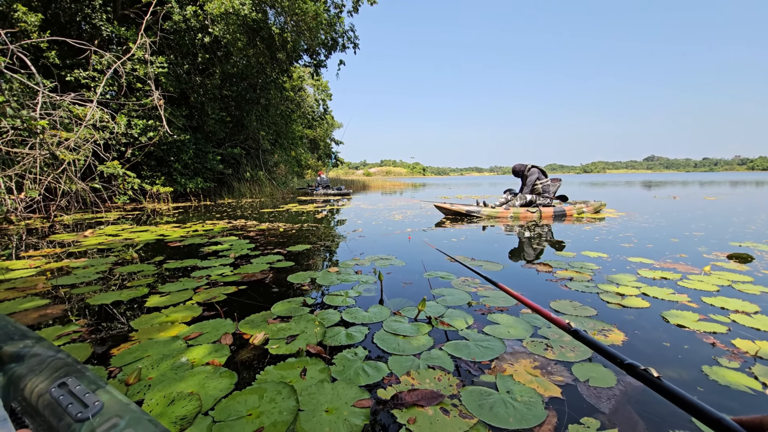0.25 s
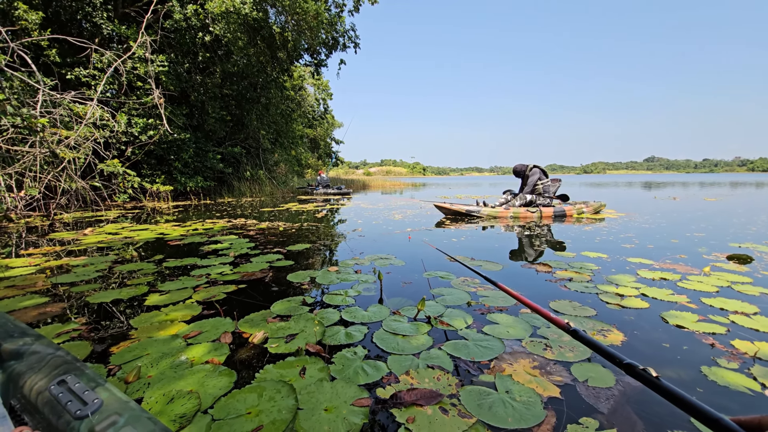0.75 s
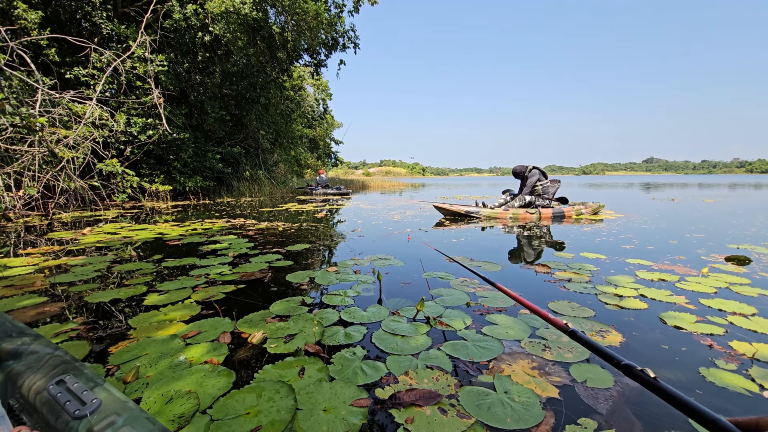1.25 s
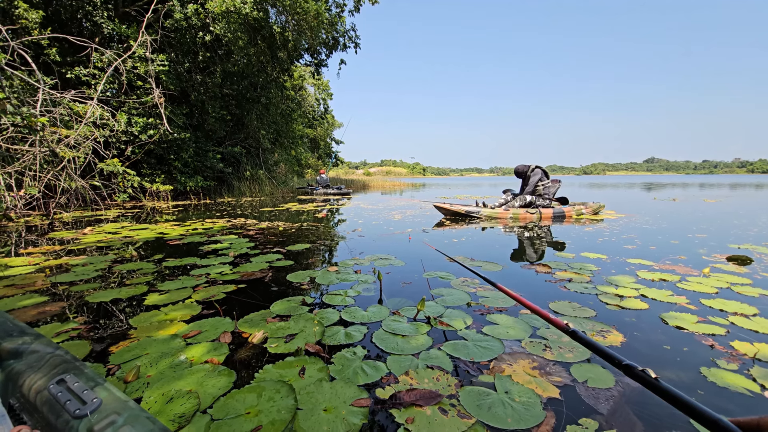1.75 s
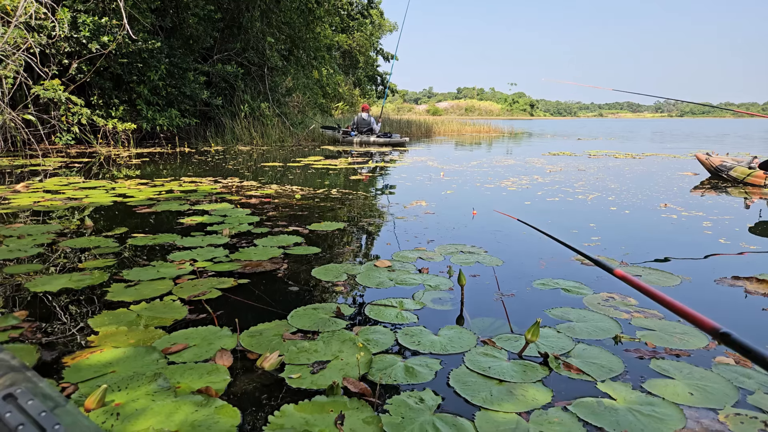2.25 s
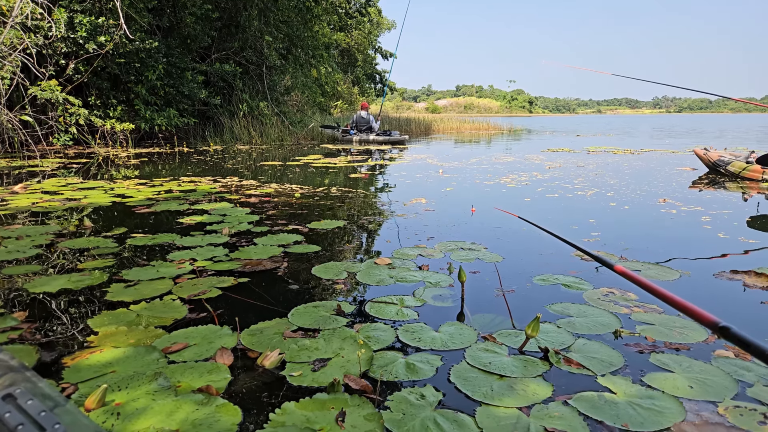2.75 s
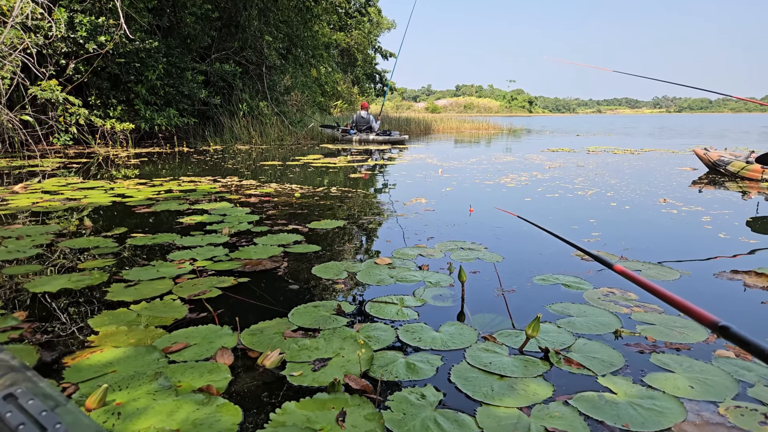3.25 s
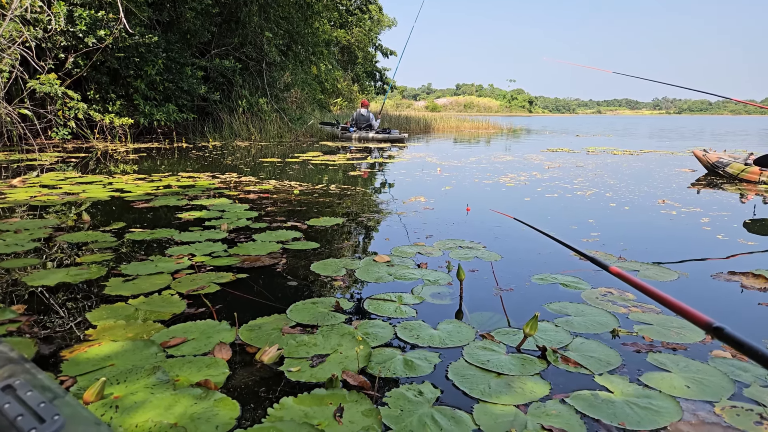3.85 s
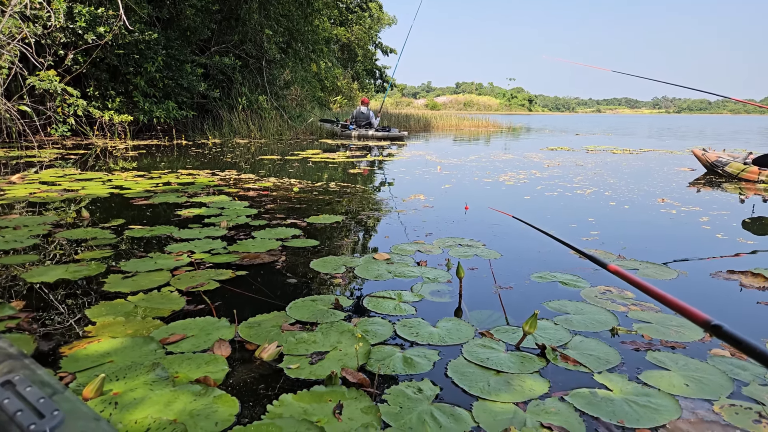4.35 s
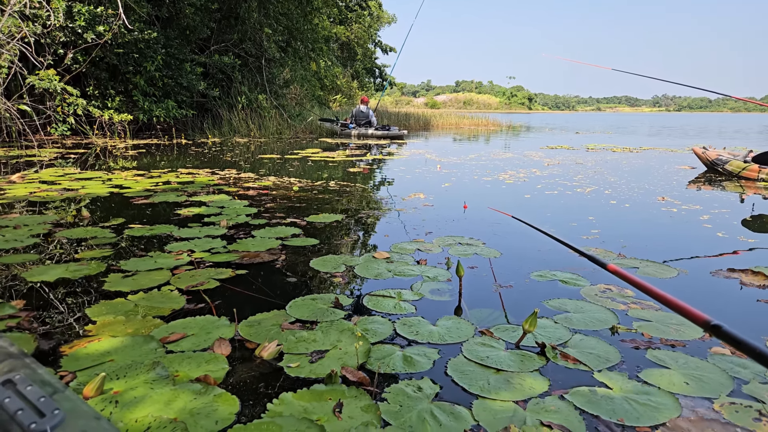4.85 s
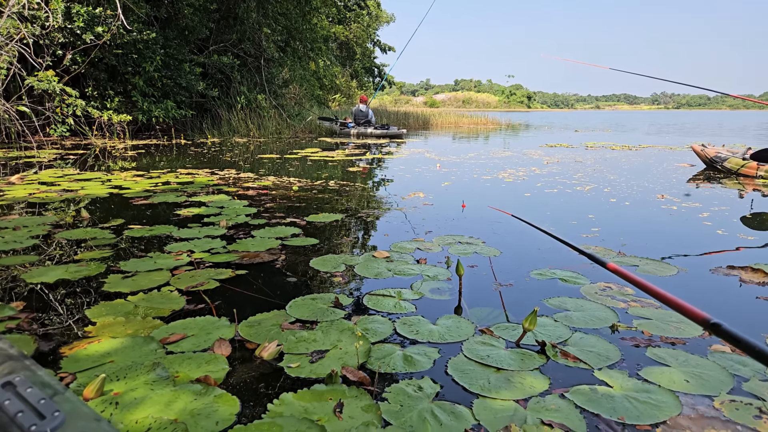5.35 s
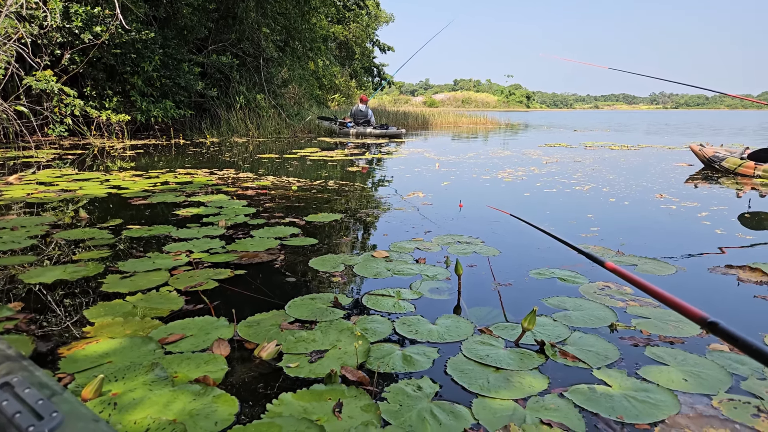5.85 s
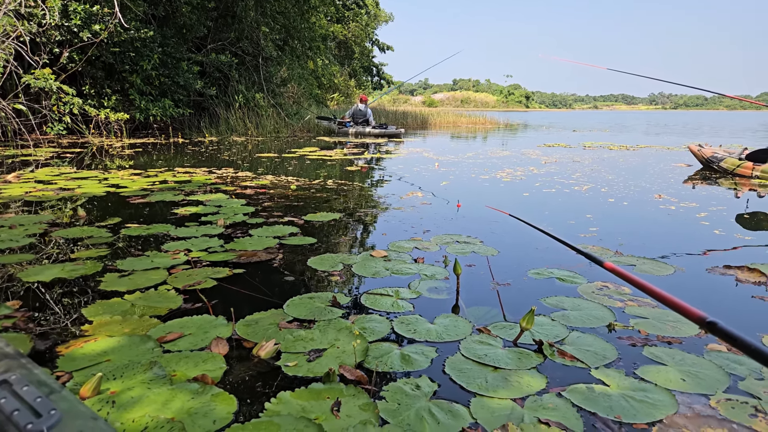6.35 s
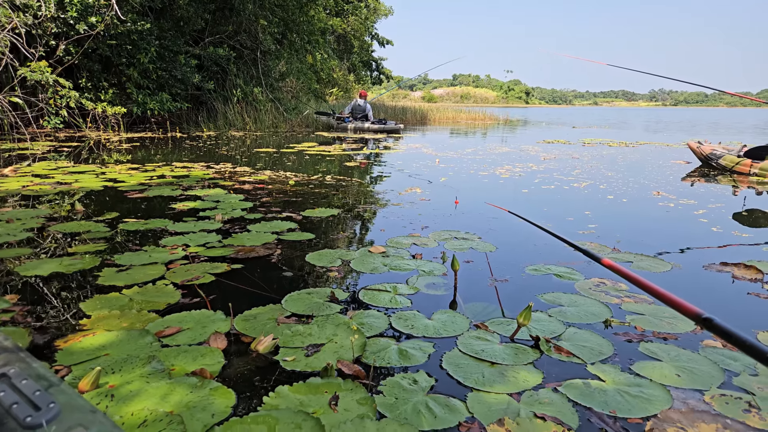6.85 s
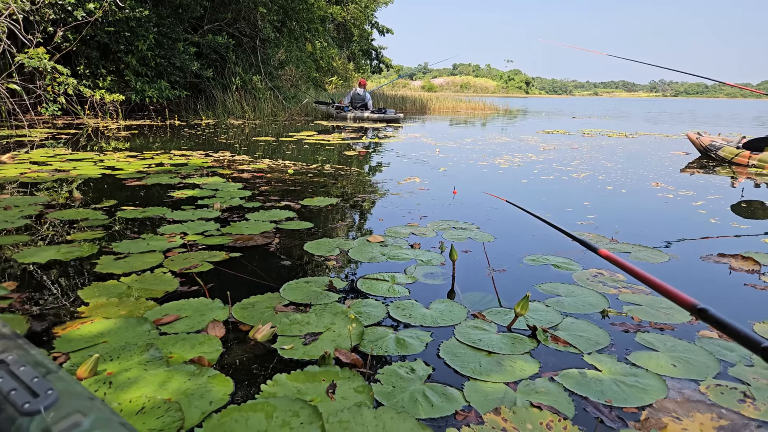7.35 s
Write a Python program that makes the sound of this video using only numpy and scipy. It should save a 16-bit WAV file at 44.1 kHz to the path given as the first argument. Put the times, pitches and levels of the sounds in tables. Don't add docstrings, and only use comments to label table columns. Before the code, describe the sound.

Outdoors on a still lake, very close to the microphone, a fishing rod butt knocks and bounces on a hollow plastic kayak, with boomy thuds, sharp cracks and loose gear rattling. After about two seconds it cuts to silence for an instant, then much quieter open air follows: thin insect hiss, faint bird peeps and whistles, small boat ticks, and two flies droning past, the second closer. Another tiny silent gap comes near the end.

```python
import sys
import numpy as np
from scipy import signal
from scipy.fft import rfft, irfft, next_fast_len
from scipy.io import wavfile
from scipy.ndimage import uniform_filter1d

SR = 44100
rng = np.random.default_rng(int(sys.argv[2]) if len(sys.argv) > 2 else 0)


def store_wav(level_fs):
    pcm = np.round(np.clip(np.atleast_2d(level_fs), -1, 1) * 32767)
    wavfile.write(sys.argv[1], SR, pcm.T.astype(np.int16))


def volts_from_decibels(level):
    exponent = np.asarray(level, float) / 20
    return 10 ** exponent


N = 335248


def evened(x):
    return x / np.sqrt(np.mean(x ** 2) + 1e-20)


def read(points, hz):
    f, value = np.transpose(points)
    return np.interp(np.log(hz + 1), np.log(f + 1), value)


def add(mix, s, sound):
    part = mix[:, round(s * SR):][:, :sound.shape[1]]
    part += sound[:, :part.shape[1]]


def placed(x, pan_db):
    return x * volts_from_decibels(np.array([pan_db / 2, -pan_db / 2]).reshape(2, -1))


def band_noise(noise, band_hz, order):
    return signal.sosfilt(signal.butter(order, band_hz, "band", fs=SR, output="sos"), noise)


def high_passed(x, hz):
    return signal.sosfilt(signal.butter(3, hz, "high", fs=SR, output="sos"), x)


# f/Hz, level/dB, t60/s, first swing (1 out, -1 in)
BELLY = [(99.2, -15.8, 0.197, 1), (109.9, -4.4, 0.084, -1), (124.4, -24.0, 0.589, 1),
         (133.6, -6.0, 0.225, -1), (147.9, -22.4, 0.607, -1), (162.5, -4.7, 0.171, -1),
         (166.3, 5.2, 0.053, 1), (186.1, -26.9, 0.597, 1), (193.5, -7.5, 0.103, -1),
         (195.5, -14.6, 0.217, 1), (215.4, -26.5, 0.6, 1), (232.7, -19.1, 0.188, 1),
         (244.6, -32.6, 0.481, -1), (268.3, -33.2, 0.385, -1)]
DECK = [(280.8, -25.1, 0.202, 1.0), (309.6, -18.3, 0.175, -1.0), (338.4, -4.8, 0.063, -1.0),
        (373.5, -5.6, 0.103, 1.0), (414.2, -10.2, 0.143, -1.0), (472.5, -11.5, 0.074, 1.0),
        (527.8, -24.1, 0.125, -1.0), (662.3, -27.1, 0.131, -1.0), (741.0, -14.1, 0.068, -1.0),
        (782.2, -8.8, 0.018, 1.0), (920.8, -20.6, 0.057, -1.0), (992.1, -26.7, 0.05, -1.0),
        (1267.3, -29.1, 0.061, 1.0), (1427.1, -29.8, 0.06, -1.0)]
# t/s, belly level/dB, deck level/dB, sign (1 rod lands, -1 springs off)
RINGS = [(0.7928, -33.3, -60.0, 1), (0.9253, -15.1, -60.0, 1), (0.9332, -60.0, -24.8, 1),
         (0.9456, -26.9, -29.0, 1), (0.962, -12.6, -19.4, 1), (0.9675, -18.7, -25.2, -1),
         (0.9864, -30.1, -32.0, 1), (1.0481, -34.4, -58.7, 1), (1.2507, -7.5, -11.4, 1),
         (1.2563, -50.1, -22.6, -1), (1.264, -20.3, -55.6, -1), (1.2747, -26.1, -57.1, 1),
         (1.2878, -23.0, -60.0, 1), (1.2952, -12.9, -34.0, 1), (1.3195, -16.4, -21.4, 1),
         (1.3449, -30.2, -36.6, 1), (1.3882, -33.3, -60.0, 1), (1.525, 0.0, 0.1, 1),
         (1.5698, -29.3, -27.1, 1), (1.6351, -19.6, -58.6, 1), (1.6499, -11.5, -44.4, 1),
         (1.661, -23.8, -60.0, 1), (1.689, -27.3, -60.0, 1), (1.7443, -31.7, -51.6, 1),
         (1.7586, -23.8, -60.0, 1), (1.803, -1.1, -0.1, 1), (1.8152, -18.1, -30.6, 1),
         (1.8465, -25.4, -60.0, 1), (1.8714, -30.4, -30.5, 1), (1.913, -27.8, -60.0, 1),
         (1.9228, -28.9, -44.6, -1), (1.9324, -30.5, -60.0, 1), (1.94, -24.8, -50.3, 1),
         (1.9667, -31.5, -42.7, 1), (1.9816, -30.1, -60.0, 1), (2.0125, -24.8, -29.6, 1),
         (2.0185, -19.4, -53.5, -1), (2.0248, -26.9, -35.8, 1), (2.0328, -34.3, -36.4, 1),
         (2.042, -60.0, -36.1, 1)]


def hull_ring():
    swell_s = 0.0014
    t = np.arange(SR // 2) / SR
    out = np.zeros((1, N))

    def body(modes):
        return sum(sign * volts_from_decibels(db - 60 * t / t60) * np.sin(2 * np.pi * hz * t) for hz, db, t60, sign in modes)

    belly = body(BELLY)
    deck = body(DECK) * (1 - np.exp(-(t / swell_s) ** 4))
    for s, belly_db, deck_db, sign in RINGS:
        add(out, s, sign * (volts_from_decibels(belly_db) * belly + volts_from_decibels(deck_db) * deck)[None])
    return out


def ring(modes, t, spot):
    hz, db, t60 = np.transpose(modes)[:, :, None]
    weight_db, detune = spot[:, :len(modes), None]
    sign = -(-1.) ** np.arange(len(modes))[:, None]
    db = db + 2.2 * weight_db
    hz = hz * (1 + 0.02 * detune)
    return (sign * volts_from_decibels(db - 60 * t / t60) * np.sin(2 * np.pi * hz * t)).sum(0)


# f/Hz, level/dB, t60/s
SLAP_LOW = [(165, 14, 0.039)]
SLAP_HIGH = [(346, 5.5, 0.03), (494, -3, .04), (734, -12.5, 0.056), (1080, -16, 0.033), (1424, -17.5, 0.1)]
RUMBLE_HZ = [94.1, 300.7]
THUD_HZ = [282.7, 1501]


def thump(t, deck_db, slap_db, edge, near, far):
    rumble_db, rumble_t60_s = -13, 0.12
    thud_db, thud_t60_s = -9.5, 0.09
    grip_s = 0.115
    swell = 1 - np.exp(-t / 0.0021)
    rumble = 4 * band_noise(near[::-1], RUMBLE_HZ, 2)
    belly = 0.14 * volts_from_decibels(slap_db) * ring(SLAP_LOW, t, 0.08 * edge)
    belly = belly + volts_from_decibels(rumble_db - 60 * t / rumble_t60_s) * swell * rumble
    slap = ring(SLAP_HIGH, t, 0.6 * edge[::-1])
    thud = 4 * band_noise(near + 0.35 * far, THUD_HZ, 1)
    deck = volts_from_decibels(slap_db) * (1 - 0.5 * np.exp(-t / 0.0017)) * slap
    deck = deck + volts_from_decibels(thud_db - 60 * t / thud_t60_s) * swell * thud
    return np.exp(-(t / grip_s) ** 2) * (belly + 0.5 * volts_from_decibels(deck_db) * deck)


def crack_and_fizz(t, near, far):
    crack_t60_s, fizz_t60_s = 0.032, 0.019
    rattle_db, rattle_t60_s = -18, 0.18
    rise = 1 - np.exp(-t / 0.00067)
    grit = near + 0.5 * far
    rattle = volts_from_decibels(rattle_db - 60 * t / rattle_t60_s) * far[::-1]
    crack = 0.7 * rise * (grit * volts_from_decibels(-60 * t / crack_t60_s) + rattle)
    fizz = 0.74 * rise * (grit * volts_from_decibels(-60 * t / fizz_t60_s) + 0.2 * rattle)
    return crack, fizz


# t/s, level/dB, upper modes/dB, crack/dB, fizz/dB
BLOWS = [(0.787, -28.5, -14, -9.5, -28), (0.927, -12, -4, -20.5, -55), (0.963, -9.5, -5, -11, -17.5),
         (1.252, -16.5, -1.5, 2, -3), (1.321, -10.5, 1, -23, -23), (1.527, -14, 1.5, -0.5, -7.5),
         (1.65, -18, -7.5, -39.5, -46), (1.805, -14.5, -1.5, -5.5, -8.5), (1.874, -14, -7, -24.5, -53.5),
         (1.905, -24.5, -7, -31, -48), (2.015, -16, 5.5, -23.5, -39)]
# t/s, level/dB, upper modes/dB, crack/dB
BOUNCES = [(0.775, -35, -7, -14), (0.799, -25.5, -14, -15), (0.821, -43, -5, -27), (0.946, -13, -28, -31.5),
           (0.98, -32, -8, -4.5), (0.994, -17, -9, -32), (1.019, -20, -21, -29), (1.276, -13.5, -24, -29.5),
           (1.293, -16.5, -2, -20), (1.345, -15, -7.5, -32), (1.422, -28.5, -13.5, -30),
           (1.46, -54, 0, -23), (1.506, -25.5, -21.5, -21), (1.561, -30.5, -10.5, -26),
           (1.597, -35.5, -7.5, -37), (1.683, -13.5, -28, -38.5), (1.759, -20, -24.5, -31),
           (1.784, -20.5, -5.5, -29), (1.84, -32, -7.5, -23), (1.971, -26.5, -7, -23),
           (2.036, -49, 19, -17)]
# f/Hz, level/dB per Hz
CRACK = [(590, -33.5), (1000, -6), (2100, -12.5), (2750, -9.5), (3800, -17.5), (4960, -14), (6860, -27),
         (8960, -28), (10100, -39.5), (11200, -38), (12300, -35.5), (14900, -45.5), (16000, -46.5)]
# f/Hz, level/dB
LEFT = [(60, -0.5), (110, -1), (200, -1), (380, -3.0), (700, 1), (1290, -6), (2380, 0), (4400, 1),
        (8120, -4.5), (15000, 1)]


def knocks():
    blow_slap_db, bounce_slap_db, bounce_fizz_db = -1.5, -3.5, -4
    delay_s, left_lag_s, contact_s, hull_cut_hz = 0.0013, 0.25e-3, 0.00061, 100
    size = next_fast_len(N)
    t = np.arange(SR // 5) / SR
    hull, low, high = np.zeros((3, 2, size))

    hits = [(*row, blow_slap_db) for row in BLOWS]
    hits += [(*row, row[-1] + bounce_fizz_db, bounce_slap_db) for row in BOUNCES]
    for s, db, deck_db, crack_db, fizz_db, slap_db in sorted(hits):
        edge = rng.standard_normal((2, len(SLAP_HIGH)))
        noise = rng.standard_normal((3, len(t)))
        near, far = noise[0], noise[1:]
        crack, fizz = crack_and_fizz(t, near, far)
        s += delay_s
        add(hull, s, volts_from_decibels(db) * thump(t, deck_db, slap_db, edge, near, far))
        add(low, s, volts_from_decibels(db + crack_db) * crack)
        add(high, s, volts_from_decibels(db + fizz_db) * fizz)
    add(hull, 0, hull_ring())

    push = np.sin(np.pi * np.minimum(t[:200] / contact_s, 1)) ** 2
    hull = signal.lfilter(push / push.sum(), 1, hull[:, :3 * SR])
    hz = np.fft.rfftfreq(size, 1 / SR)
    colour = volts_from_decibels(read(CRACK, hz))
    upper = 1 / (1 + (4000 / (hz + 1)) ** 6)
    both = rfft(high_passed(hull, hull_cut_hz), size)
    both += rfft(low) * evened(colour * (1 - upper))
    both += rfft(high) * evened(colour * upper)
    both[0] *= volts_from_decibels(read(LEFT, hz)) * np.exp(-2j * np.pi * hz * left_lag_s)
    return irfft(both, size)[:, :N] * (np.arange(N) < np.mean(CUTS[0]) * SR)


# t/s, length/s, centre
# f/Hz, width/Hz, level/dB
RUSTLES = [(2.013, 0.016, 1250, 800, -37), (0.963, 0.02, 1250, 700, -35), (1.32, 0.018, 700, 350, -31),
           (1.651, 0.026, 1180, 1000, -55), (1.251, .016, 780, 300, -32), (1.526, .014, 1200, 600, -31),
           (1.804, .016, 1300, 600, -35), (.785, .03, 1200, 700, -55), (1.765, .055, 2000, 3000, -53),
           (1.238, .025, 3000, 4500, -55), (1.545, .04, 3500, 4000, -56), (1.285, .02, 6000, 10000, -52),
           (.97, .05, 3500, 3000, -50), (1.66, .016, 6000, 8000, -62), (.963, .01, 12500, 4000, -46),
           (.97, .04, 12500, 4000, -58), (1.25, .01, 12500, 3500, -44), (1.26, .06, 12500, 3500, -58),
           (1.792, .014, 5000, 6000, -54), (4.385, 0.044, 8600, 900, -69), (4.41, 0.041, 6600, 1800, -60),
           (4.43, 0.047, 4600, 900, -67), (5.51, 0.027, 4630, 1200, -64), (7.405, 0.012, 2500, 2500, -65),
           (.925, .04, 260, 90, -27), (.795, .06, 240, 120, -45), (1.968, .014, 5200, 1500, -59),
           (1.265, .07, 3500, 4500, -53), (1.32, .04, 3000, 4000, -53)]


def rustles():
    out = np.zeros((2, N))
    for s, length, hz, width, db in RUSTLES:
        grit = rng.standard_normal((2, int(length * SR)))
        puff = evened(band_noise(grit, [hz - width / 2, hz + width / 2], 2))
        add(out, s, volts_from_decibels(db) * puff * np.hanning(grit.shape[1]))
    return out


# t/s, peak level/dB, centre f/Hz, width/Hz, left-right/dB
TICKS = [
    (2.944, -42, 119, 80, 18.5),
    (4.095, -45.5, 893, 401, 15.5),
    (4.695, -33, 290, 510, 23),
    (4.695, -42.5, 1200, 500, 9),
    (4.697, -44.5, 5000, 6000, 27),
    (4.698, -40.5, 64, 35, 12),
    (5.837, -37.5, 7900, 5000, 11),
    (7.3463, -31, 3480, 3960, 16),
    (7.3497, -33, 3400, 3950, 26.5),
]


def ticks():
    out = np.zeros((2, N))
    t = np.arange(6000) / SR
    for s, db, hz, width, pan_db in TICKS:
        swing = volts_from_decibels(db) * np.exp(-np.pi * width * t) * np.sin(2 * np.pi * hz * t)
        add(out, s, placed(high_passed(swing, 0.47 * hz), pan_db))
    return out


def unrolled(rows):
    s, *columns = np.transpose(rows)
    t = np.arange(s[0], s[-1], 1 / SR)
    return s[0], [np.interp(t, s, c) for c in columns], signal.windows.tukey(len(t), 0.2)


def waver(count, seconds):
    width = int(seconds * SR)
    return evened(uniform_filter1d(uniform_filter1d(rng.standard_normal(count), width), width))


# t/s, wing beat f/Hz, level/dB
FLIES = [
    [(4.22, 208.6, -67.5), (4.3, 222.8, -65.5), (4.358, 229, -56), (4.41, 218.8, -62.5),
     (4.52, 214.8, -66.5), (4.64, 209, -64)],
    [(5.41, 198.6, -68), (5.442, 204.9, -49), (5.486, 207.5, -48), (5.57, 208, -57.5), (5.69, 211, -66),
     (5.74, 210, -69.5), (5.8, 213.3, -67.5), (5.93, 218.2, -63)],
]
FLY_BRIGHT_DB = [-4, -3.5]
FLY_PAN_DB = [-6, -3]
# multiple of beat, level/dB
WING = [(1, -1), (2, -8.5), (3, -29), (4, -12.5), (5, -11), (6, -15), (7, -26), (8, -29), (9, -32),
        (10, -31)]


def flies():
    out = np.zeros((2, N))
    for rows, bright_db, pan_db in zip(FLIES, FLY_BRIGHT_DB, FLY_PAN_DB):
        s, (hz, db), fade = unrolled(rows)
        count = len(hz)
        turns = np.cumsum(hz * (1 + 0.0096 * waver(count, 0.017))) / SR
        wings = np.zeros(count)
        for k, k_db in WING:
            turn_db = (bright_db + 2.4 * waver(count, 0.04)) * (k > 2.5)
            wings += volts_from_decibels(k_db + turn_db) * np.cos(2 * np.pi * round(k) * turns + 0.9 * k)
        level = np.sqrt(2) * volts_from_decibels(db + waver(count, 0.013))
        add(out, s, placed(level * fade * wings, pan_db))
    return out


def whistles(calls, overtone_db, flutter_db, blur=0):
    out = np.zeros((2, N))
    for rows in calls:
        s, (hz, db, pan_db), fade = unrolled(rows)
        phase = 2 * np.pi * np.cumsum(hz * (1 + blur * waver(len(hz), 0.002))) / SR
        tone = np.sin(phase) + volts_from_decibels(overtone_db) * np.sin(2 * phase)
        level = np.sqrt(2) * volts_from_decibels(db + flutter_db * waver(len(hz), 0.0028))
        add(out, s, placed(level * fade * tone, pan_db))
    return out


def notes(calls, arch=0, pan_db=0):
    edge_db, top_at = -5, 0.4
    u = np.linspace(0, 1, 9)
    swell_db = edge_db * np.interp(u, [0, top_at, 1], [1, 0, 1]) ** 2
    curves = []
    for s, length, first, last, db in calls:
        lift = 1 + arch * 5 * length * np.sin(np.pi * u)
        hz = (first + (last - first) * u) * lift
        curves.append(np.transpose([s + length * u, hz, db + swell_db, pan_db + 0 * u]))
    return curves


# t/s, length/s, first f/Hz, last f/Hz, level/dB
HUMS = [
    (0.001, 0.18, 618, 525, -61.5),
    (.14, 0.19, 486, 435, -65),
    (3.35, 0.13, 457.5, 457, -67.5),
    (4.385, 0.111, 1136, 1056, -67),
    (5.12, .28, 261.7, 244.4, -63),
]


def hums():
    return whistles(notes(HUMS, 0, -5), -23, 2.0)


# t/s, f/Hz, level/dB
SONG = [
    (2.531, 3710, -75.5),
    (2.578, 4270, -68),
    (2.647, 4490, -67),
    (2.7, 4584, -65),
    (2.822, 3846, -75),
    (2.882, 4500, -67),
    (2.904, 4430, -66.5),
    (2.95, 3950, -77),
]
# t/s, length/s, first f/Hz, last f/Hz, level/dB
TWITTER = [(7.222, .175, 3450, 3740, -72), (7.35, .045, 3930, 3680, -73), (2.02, .045, 4450, 4450, -65),
           (4.865, .07, 3870, 3900, -75), (4.972, .085, 4300, 4180, -68), (5.135, .07, 3950, 3750, -75),
           (5.26, .11, 3850, 3700, -74), (4.91, .06, 4750, 4850, -77), (5.04, .04, 4850, 5050, -73),
           (5.095, .065, 4850, 5150, -73), (2.585, .06, 4950, 5150, -75), (2.86, .055, 5050, 5150, -73)]
# t/s, f/Hz, level/dB
PEEPS = [
    (2.21, 2373, -69.5),
    (2.585, 2401, -65.5),
    (5.863, 2350, -66),
    (6.255, 2353, -65.5),
]
# t/s, length/s, f/Hz, level/dB
PIPES = [(1.11, .09, 2870, -76), (1.135, .09, 2740, -73), (1.17, .075, 3170, -72), (1.475, .025, 2700, -69),
         (1.56, .12, 3200, -77), (1.474, 0.083, 3020, -62.5), (1.53, 0.16, 2960, -67.5),
         (4.233, 0.048, 2820, -77), (4.38, 0.079, 3130, -76.5), (4.52, .05, 3200, -75.5),
         (4.59, .08, 3150, -74), (4.675, .05, 3180, -75), (4.803, 0.28, 3070, -76.5),
         (6.65, .15, 2840, -77.5), (2.798, 0.082, 2885, -73.5)]


def birds():
    bank_pan_db, peep_s, peep_sag_hz = 7.5, 0.038, 130
    song = [[(*row, bank_pan_db) for row in SONG]]
    peeps = notes([(s, peep_s, hz, hz - peep_sag_hz, db) for s, hz, db in PEEPS])
    pipes = notes([(s, length, hz, hz, db) for s, length, hz, db in PIPES])
    out = whistles(song, -18, 2.2)
    out += whistles(peeps, -33, 2.8, 0.025)
    out += whistles(pipes, -25, 4.1, 0.023)
    return out + whistles(notes(TWITTER, 0.11, 1.5), -31, 3.5, 0.008)


# f/Hz, level/dB per Hz
AIR_BEFORE = [(18, -39), (30, -14.5), (124, -8.5), (221, -9.5), (319, -6), (426, -11.5), (584, -12),
              (780, -21.5), (1220, -21.5), (1670, -21), (4780, -19.5), (6210, -26), (7870, -35.5),
              (12300, -32.5), (16000, -35)]
AIR_AFTER = [(18, -49), (30, -4.5), (127, -4), (184, -8), (259, -1.5), (355, -12), (449, -5), (499, -13.5),
             (632, -8.5), (844, -18), (1040, -16.5), (7670, -20.5), (9460, -40), (12300, -30), (16000, -39)]
# f/Hz, share
SAME = [(60, 0.4), (240, 0.62), (950, 0.035), (3770, 0.027), (15000, 0.02)]
# f/Hz, level/dB
AIR_LEFT = [(60, 1), (110, -1), (200, -1.5), (380, -2.5), (700, -2.0), (1290, -2.5), (2380, 0.5),
            (4400, 3.5), (8120, 3.5), (15000, 3)]
# t/s, level/dB
HISS = [(0, 3), (2.06, 9), (2.2, 4.5), (2.6, -2), (4.5, -4), (5.5, 0), (7, 2.5), (7.6, 2.5)]
# middle t/s, half length/s, level/dB
GUSTS = [
    (0.898, 0.46, 8),
    (2.404, 0.2, 11.5),
    (3.4, 0.55, 6.5),
    (7.3, 0.05, 5.5),
    (7.581, .04, 10.5),
    (1.75, .35, 20),
    (6.12, 0.056, 8.5),
]
# f/Hz, width/Hz, level before/dB, level after/dB
RIDGES = [(4730, 720, 1.5, 2.5), (6237, 280, 6, 1), (7783, 364, 2.5, 3.5), (8660, 270, 6, 6),
          (9990, 1100, -10.5, -6.5)]


def air():
    before_rms_db, after_rms_db, calm_db = -61, -62, -1.5
    frames = N // 256 + 5
    hz = np.fft.rfftfreq(1024, 1 / SR)
    t = np.arange(frames) * 256 / SR
    a, b, c, d, patches = rng.standard_normal((5, 513, frames))
    patches = evened(uniform_filter1d(uniform_filter1d(patches, 10, 0), 14, 1))

    before = volts_from_decibels(before_rms_db) * evened(volts_from_decibels(read(AIR_BEFORE, hz)))
    after = volts_from_decibels(after_rms_db) * evened(volts_from_decibels(read(AIR_AFTER, hz)))
    shape = np.where(t < np.mean(CUTS[0]), before[:, None], after[:, None])

    hiss_db = np.interp(t, *np.transpose(HISS)) - 5 * (t < CUTS[0][0])
    breeze_db = calm_db + sum(db * np.exp(-((t - s) / half) ** 2) for s, half, db in GUSTS)
    drift_db = np.outer(hz > 10000, hiss_db)
    drift_db += np.outer(hz < 110, breeze_db + 2.375 * patches[1])
    for ridge_hz, width, before_db, after_db in RIDGES:
        ridge = np.exp(-((hz - ridge_hz) / width) ** 4)
        drift_db += np.outer(ridge, np.where(t < CUTS[0][1], before_db, after_db))

    same = np.clip(read(SAME, hz), -1, 1)[:, None]
    left = a + 1j * b
    z = np.array([left, same * left + np.sqrt(1 - same ** 2) * (c + 1j * d)])
    z *= placed(np.ones(513), read(AIR_LEFT, hz))[:, :, None]
    z *= shape * volts_from_decibels(drift_db + 1.18 * patches)
    return signal.istft(z, nperseg=1024, noverlap=768)[1][:, :N] * volts_from_decibels(-24)


def scene():
    return knocks() + rustles() + ticks() + flies() + hums() + birds() + air()


def low_pass(x):
    return signal.sosfilt(signal.butter(12, 16650, fs=SR, output="sos"), x)


# start t/s, end t/s
CUTS = [
    (2.0648, 2.1065),
    (7.4925, 7.5565),
]


def record(dry):
    t = np.arange(N) / SR
    running = np.prod([(t < a) | (t > b) for a, b in CUTS], axis=0)
    edge = signal.firwin(255, 15850, window=("kaiser", 9), fs=SR)
    heard = signal.oaconvolve(np.clip(dry, -1, 1), edge[None], "same")
    return low_pass(heard * running)


dry = scene()
out = record(dry)
store_wav(out)
```